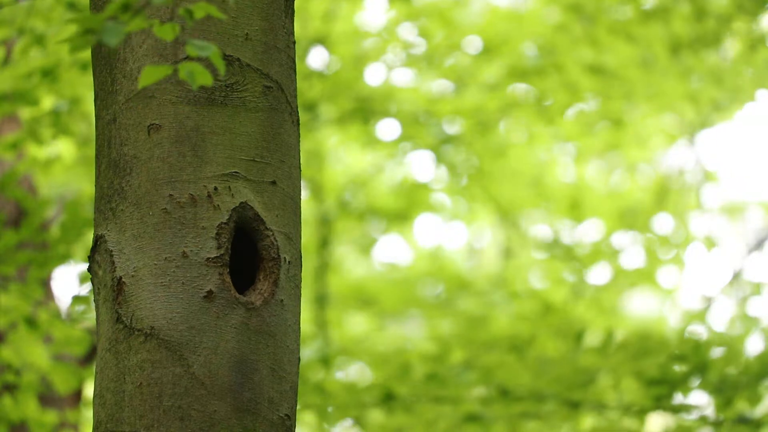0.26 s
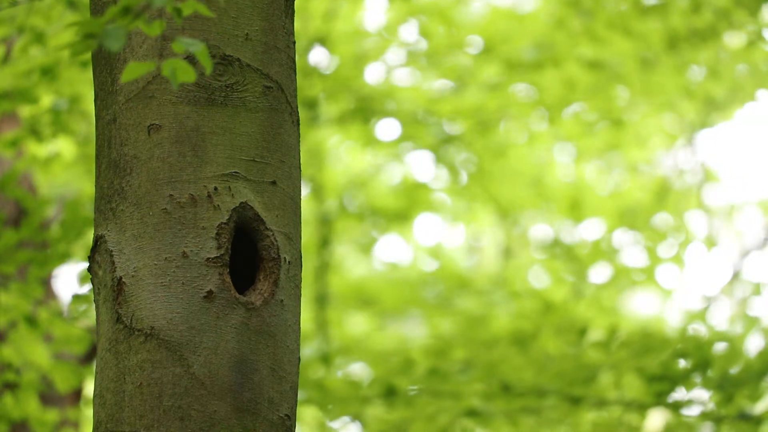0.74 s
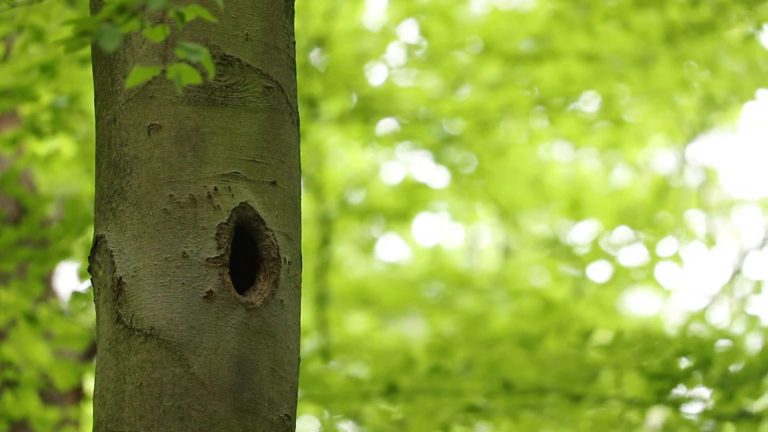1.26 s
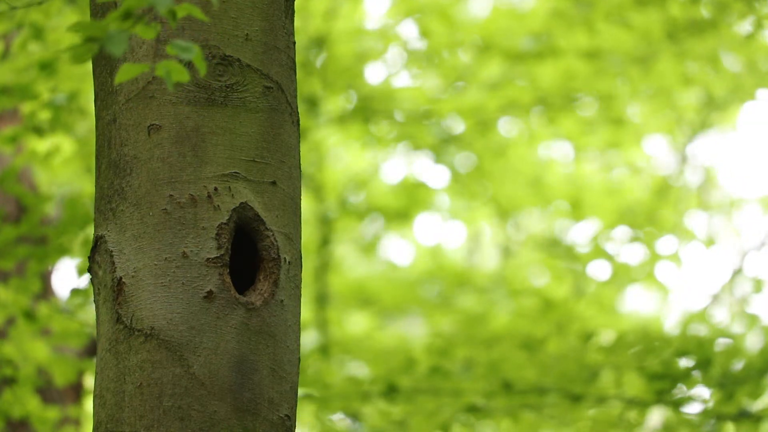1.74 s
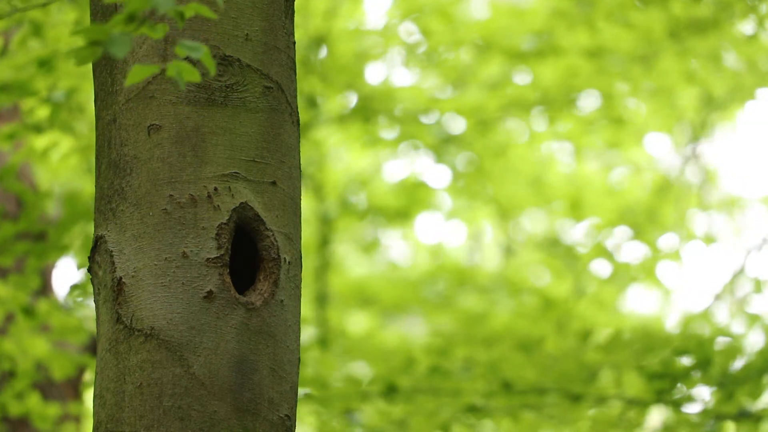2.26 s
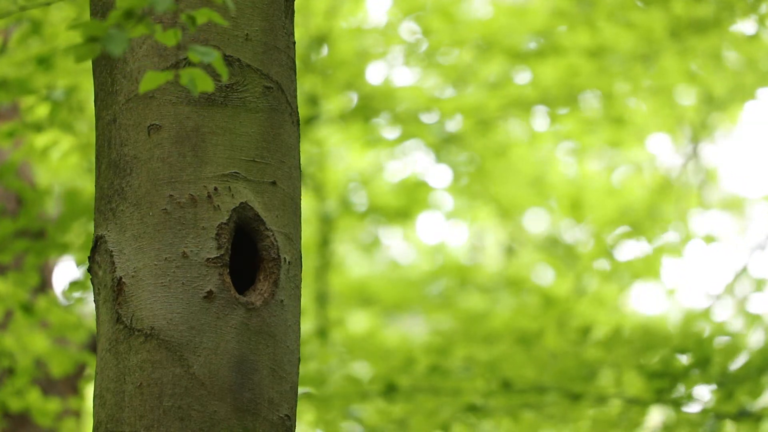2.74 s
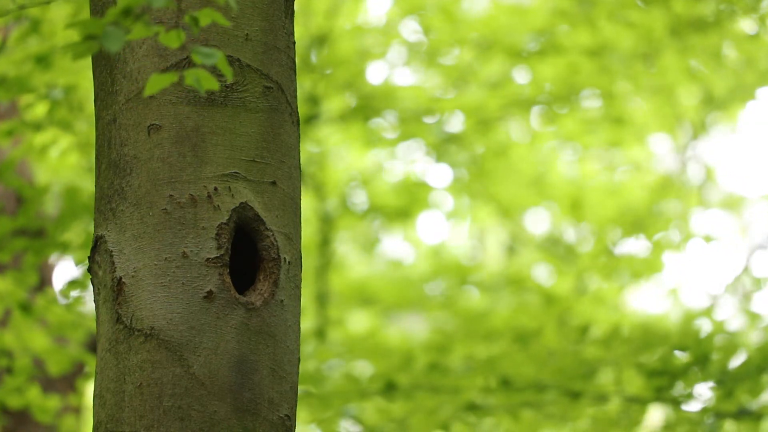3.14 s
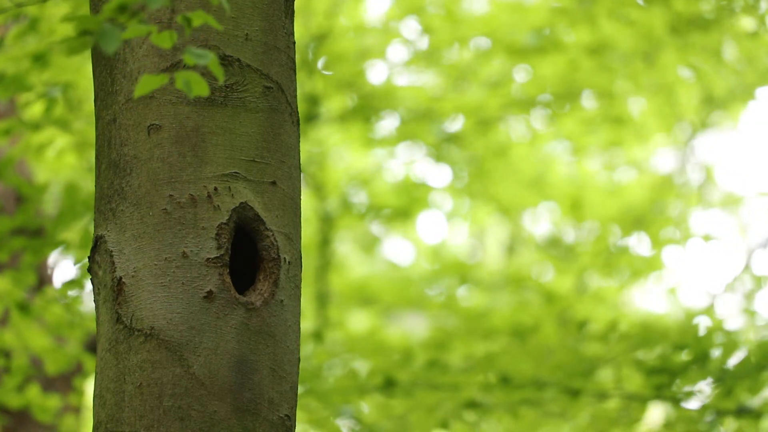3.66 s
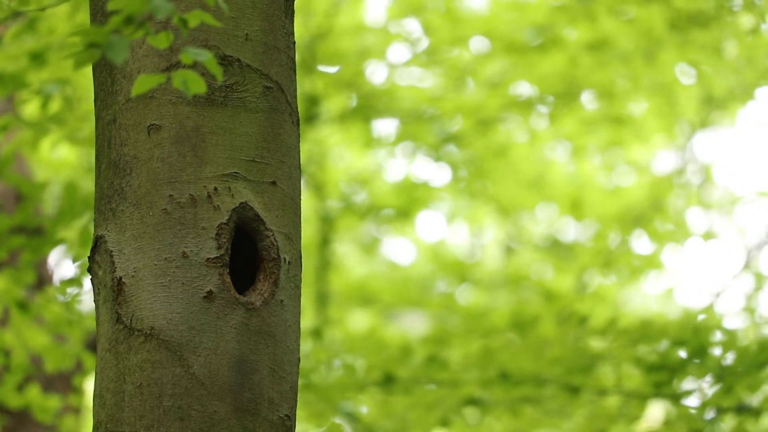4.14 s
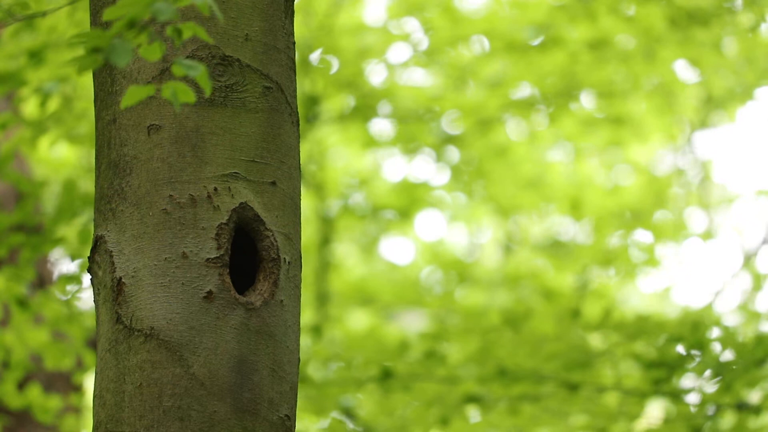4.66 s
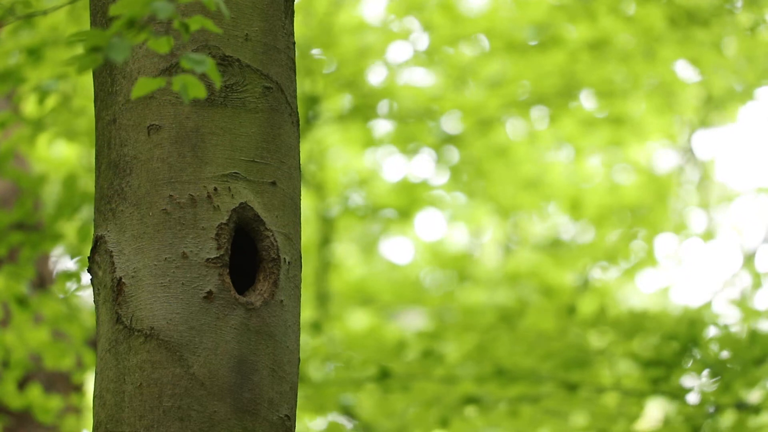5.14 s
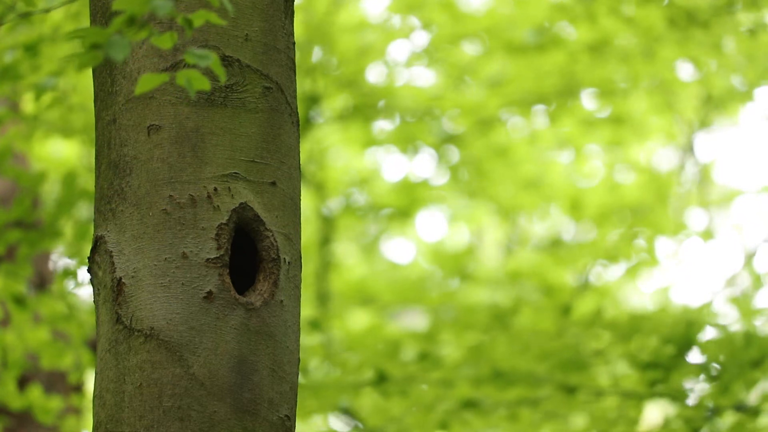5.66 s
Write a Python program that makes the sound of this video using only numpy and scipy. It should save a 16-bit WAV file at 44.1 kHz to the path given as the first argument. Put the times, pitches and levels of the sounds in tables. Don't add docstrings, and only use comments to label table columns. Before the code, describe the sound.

Outdoor stereo in leafy woodland: steady soft leaf hiss, faint low hum and a distant shimmer of birds. Several songbirds chip, trill and whistle at modest level with long echo, a mellow one to the left. Wind bumps the right side for the first two and a half seconds, then stops. Near the end a woodpecker on the right gives loud, rattling bursts of short whistled pulses, ringing between the trunks.

```python
import sys
import numpy as np
from scipy import signal
from scipy.fft import rfft, irfft, next_fast_len
from scipy.io import wavfile
from scipy.ndimage import uniform_filter1d, map_coordinates

SR = 44100
rng = np.random.default_rng(int(sys.argv[2]) if len(sys.argv) > 2 else 0)


def how_loud(loudness_db):
    steps = np.asarray(loudness_db, float) / 20
    return 10 ** steps


def pcm_store(signal):
    levels = np.round(np.clip(np.atleast_2d(signal), -1, 1) * 32767)
    wavfile.write(sys.argv[1], SR, levels.astype(np.int16).T)


N = 259749
TIME = np.arange(N) / SR
LAG_S = 0.00018


def unit(x):
    return x / np.sqrt(np.mean(x ** 2) + 1e-20)


def along(points, hz):
    f, v = np.transpose(points)
    return np.interp(np.log(hz + 1), np.log(f + 1), v)


def curves(rows, t=TIME):
    s, *cols = np.transpose(rows)
    return [np.interp(t, s, c) for c in cols]


def wobble(rate_hz, count=N):
    knots = rng.standard_normal(int(count * rate_hz / SR) + 4)
    return map_coordinates(knots, [np.arange(count) * rate_hz / SR])


def filtered(x, response):
    m = next_fast_len(N + 8192)
    return irfft(rfft(x, m) * response(np.fft.rfftfreq(m, 1 / SR)), m)[..., :N]


def shaped(x, points):
    return filtered(x, lambda hz: how_loud(along(points, hz)))


def add(track, s, x):
    part = track[..., max(round(s * SR), 0):][..., :x.shape[-1]]
    part += x[..., :part.shape[-1]]


def patchy(depth_db, bins, frames):
    z = signal.stft(rng.standard_normal((2, N)), nperseg=512)[2]
    field = uniform_filter1d(rng.standard_normal(z.shape[1:]), bins, 0)
    field = uniform_filter1d(field, frames, 1)
    return signal.istft(z * how_loud(depth_db * unit(field)), nperseg=512)[1][:, :N]


# (frequency [Hz], t60 [s])
ECHO_DECAY = [(1000, 1), (2000, 1), (4000, 1), (8000, 0.65), (15000, 0.96)]


def echo(x, gap_s, piece=8192):
    out = np.zeros((2, N))
    for start in range(0, N, piece):
        hz, t, z = signal.stft(rng.standard_normal((2, SR * 3 // 4)), SR, nperseg=256)
        swell = np.clip(t / gap_s, 0, 1)
        decay = how_loud(-60 * t / along(ECHO_DECAY, hz)[:, None])
        tail = signal.istft(z * swell * decay, SR, nperseg=256)[1]
        tail = tail / np.linalg.norm(tail[0])
        add(out, start / SR, signal.fftconvolve(x[None, start:start + piece], tail, axes=1))
    return out


# (frequency [Hz], density [dB/Hz])
AIR_SPECTRUM = [(10, -47.5), (25, -37), (60, -44), (100, -18.5), (160, -18), (300, -15), (600, -16.5),
                (1300, -21), (2500, -27.5), (5000, -39), (8000, -34.5), (12000, -43.5), (15500, -47.5)]
# (frequency [Hz], likeness [0-1])
PORT_LIKENESS = [(30, .3), (130, .35), (300, .6), (650, .4), (1400, .3), (3000, .3), (7000, .2),
                 (15000, .1)]
# (frequency [Hz], left minus right [dB])
AIR_BALANCE = [(60, 5), (700, 2), (4000, 1.5)]


def air(level_db=-49):
    def mid_side(hz):
        angle = np.arccos(np.clip(along(PORT_LIKENESS, hz), -1, 1)) / 2
        return how_loud(along(AIR_SPECTRUM, hz)) * [np.cos(angle), np.sin(angle)]

    def balance(hz):
        half_db = along(AIR_BALANCE, hz) / 2
        return [how_loud(half_db) * np.exp(-2j * np.pi * hz * LAG_S), how_loud(-half_db)]

    mid, side = filtered(patchy(0.27, bins=6, frames=14), mid_side)
    return how_loud(level_db) * unit(filtered(np.array([mid + side, mid - side]), balance))


# (time [s], level [dB])
CHORUS_LEVEL = [(0.0, -49), (0.95, -47.5), (1.77, -49), (4.56, -52), (4.99, -46), (5.89, -48)]
# (frequency [Hz], gain [dB])
CHORUS_BAND = [(1200, -12), (2200, -5), (2900, -4.5), (3600, 0), (4300, -5.5), (5200, -10), (7000, -17.5),
               (9000, -67)]


def chorus():
    shimmer = shaped(patchy(3.2, bins=4, frames=7), CHORUS_BAND)
    return how_loud(curves(CHORUS_LEVEL)[0] - 1.0) * unit(shimmer)


# (time [s], level [dB])
SWAY_LEVEL = [(2.7, -54.5), (5.58, -54.5), (5.89, -58.5)]
# (frequency [Hz], gain [dB])
SWAY_BAND = [(10, -24), (25, 3), (60, 1), (90, -9), (150, -34), (400, -120)]


def sway():
    rumble = shaped(rng.standard_normal((2, N)), SWAY_BAND)
    rumble = rumble + 0.28 * rumble[::-1]
    gusts = how_loud(6.0 * np.array([wobble(9.6), wobble(3.38)]))
    port_db = [[5.5], [2.5]]
    return how_loud(curves(SWAY_LEVEL)[0] + port_db) * unit(rumble * gusts)


# (time [s], length [s], from [Hz], to [Hz], level [dB])
BLACKBIRD = [(0, 0.13, 2390, 2412, -51), (2.45, 0.082, 2853, 2820, -42), (2.54, 0.075, 2857, 2846, -43.5),
             (2.66, 0.036, 2190, 2230, -44.5), (2.669, 0.03, 2830, 2730, -59),
             (3.116, 0.11, 2792, 2744, -51.5), (3.29, 0.0905, 2713, 2390, -45.5),
             (3.363, 0.12, 2430, 2282, -40), (3.469, 0.15, 2260, 2197, -40),
             (3.553, 0.094, 1550, 1951, -48), (3.766, .03, 2910, 2115, -38),
             (3.794, 0.047, 2150, 2100, -38.5), (3.83, 0.13, 2138, 2331, -41.5),
             (3.946, 0.089, 2180, 2270, -42.5), (4.177, .07, 1720, 2367, -41),
             (4.22, 0.039, 2157, 2283, -42.5), (4.544, 0.063, 1665, 2096, -42),
             (4.979, 0.068, 2060, 2400, -37.5), (5.034, 0.072, 2410, 3200, -36),
             (5.114, 0.093, 3163, 2793, -42.5), (5.393, 0.063, 2677, 2850, -40),
             (5.44, 0.083, 2740, 2710, -44)]


def blackbird(pan_db=11.5):
    return [(*note, pan_db) for note in BLACKBIRD]


# (time [s], from [Hz], to [Hz], level [dB])
CHIPS = [
    (0.034, 5910, 4883, -50),
    (.21, 5910, 5040, -46),
    (1.919, 4300, 3650, -45),
    (2.067, 4200, 3170, -43),
    (2.239, 3700, 2924, -43),
    (2.687, 3800, 2940, -49),
    (3.15, 5200, 4300, -50),
    (3.22, 5300, 4290, -54),
    (3.782, 4000, 3090, -48),
]


def chips(length_s=.04):
    return [(s, length_s, *rest, 0) for s, *rest in CHIPS]


def repeats(shape, first_s, every_s, levels_db, step_hz=0):
    notes = []
    for k, level_db in enumerate(levels_db):
        for s, length, from_hz, to_hz, db, pan_db in shape:
            shift_hz = k * step_hz
            notes.append((first_s + k * every_s + s, length, from_hz + shift_hz, to_hz + shift_hz,
                          level_db + db, pan_db))
    return notes


# (time [s], length [s], from [Hz], to [Hz], level [dB], left minus right [dB])
QUICK_SYLLABLE = [
    (0, .047, 3800, 3020, 0, -1.5),
    (.08, .035, 4480, 4520, -14, -8),
]
QUICK_DB = [-55, -51, -43.5, -47, -45, -46, -43, -45]
# (time [s], length [s], from [Hz], to [Hz], level [dB], left minus right [dB])
SLOW_SYLLABLE = [
    (0.0095, .04, 3930, 3740, 2, -2),
    (0.023, .046, 3200, 2930, -2, 1),
    (.045, 0.089, 4930, 4860, -10.5, 0),
    (0.069, .06, 2950, 2390, -7.5, 1),
    (.085, 0.05, 4500, 3850, -6, 6),
]
SLOW_DB = [-42, -41.5, -39.5]
# (time [s], length [s], from [Hz], to [Hz], level [dB])
FLOURISH = [
    (1.203, 0.092, 4860, 4890, -52),
    (1.245, 0.066, 6430, 4980, -48),
    (1.366, .083, 6400, 5160, -51),
    (1.482, 0.076, 3660, 3755, -41.5),
    (1.505, .03, 3120, 2740, -52),
    (1.578, 0.0325, 3063, 2690, -45),
    (1.584, .03, 2926, 3150, -42),
    (1.629, .057, 2900, 2230, -47),
]


def finch():
    quick = repeats(QUICK_SYLLABLE, .087, .0872, QUICK_DB)
    slow = repeats(SLOW_SYLLABLE, .783, 0.14, SLOW_DB, step_hz=-68.5)
    return quick + slow + [(*note, 0) for note in FLOURISH]


# (time [s], length [s], from [Hz], to [Hz], level [dB], left minus right [dB])
TIT_ROUND = [
    (0, .12, 4277, 4204, 2, 6),
    (.115, 0.094, 6100, 6080, -9, -10),
]
TIT_DB = [-45.5, -45.5, -49, -46.5, -49.5]


def tit():
    return repeats(TIT_ROUND, .384, .268, TIT_DB, step_hz=22.3)


# (time [s], length [s], from [Hz], to [Hz], level [dB])
RIVAL = [(1.815, 0.14, 1700, 1850, -51), (1.956, 0.058, 1790, 1769, -49), (2.079, .13, 2447, 1900, -45.5),
         (2.195, 0.089, 1958, 1690, -44.5), (2.397, 0.063, 2034, 2280, -44), (2.446, 0.18, 2220, 2300, -56),
         (2.863, 0.067, 3130, 3840, -54), (2.922, 0.081, 2880, 3050, -46.5), (3.022, .14, 3070, 2840, -52),
         (2.988, 0.051, 2404, 1937, -44), (4.251, 0.093, 4210, 4112, -53), (4.28, 0.12, 2240, 2276, -54),
         (4.295, .15, 7840, 7724, -64), (4.44, 0.049, 1780, 1694, -45.5), (5.55, 0.053, 4750, 4280, -39.5),
         (5.583, 0.068, 4275, 4203, -44)]


def rival():
    return [(*note, 0) for note in RIVAL]


def songbirds(wet_db=0, dry_db=-2.5):
    near, song = np.zeros((2, N)), np.zeros(N)
    for s, length, from_hz, to_hz, db, pan_db in blackbird() + chips() + finch() + tit() + rival():
        u = np.linspace(0, 1, int(length * 1.1 * SR))
        glide = (1 - u) ** (2.4 if from_hz - to_hz > 600 else 1.1)
        warble = 1 + .006 * wobble(130, count=len(u))
        pitch_hz = (to_hz + (from_hz - to_hz) * glide) * warble
        level = how_loud(db + 3.2 * wobble(70, count=len(u)))
        shape = np.abs(np.sin(np.pi * u ** .8)) ** .9 * level
        note = shape * np.sin(2 * np.pi * np.cumsum(pitch_hz) / SR)
        direct = how_loud(-7 * (abs(from_hz - to_hz) > 500))
        add(near[0], s + LAG_S, direct * how_loud(pan_db / 2) * note)
        add(near[1], s, direct * how_loud(-pan_db / 2) * note)
        add(song, s, note)
    return how_loud(dry_db) * near + how_loud(wet_db) * echo(song, gap_s=0.01)


# (time [s], level [dB])
BREEZE_LEVEL = [(0.0, -54.5), (2.26, -53), (2.5, -54), (2.7, -66)]
# (frequency [Hz], gain [dB])
BUFFET_BAND = [(15, -120), (25, -6), (60, 3.5), (120, 0), (200, -10), (400, -18.5), (800, -120)]


def buffeting():
    fade = np.clip((2.62 - TIME) / .2, 0, 1)
    rumble = shaped(rng.standard_normal(N), BUFFET_BAND)
    lumpy = unit(rumble * how_loud(3.5 * wobble(24.85)))
    return how_loud(curves(BREEZE_LEVEL)[0] + 11.0) * fade * lumpy


# (time [s], peak level [dB], frequency [Hz])
THUMPS = [(0.014, -23.5, 157), (0.066, -26, 131), (0.089, -30.5, 75), (0.478, -23.5, 84.4),
          (0.6094, -31, 90), (0.6786, -20, 93), (0.7954, -23, 103), (0.807, -21, 154), (0.819, -27, 60),
          (0.865, -26.5, 62), (0.9295, -27, 94), (.992, -27, 113), (1.253, -22.5, 147),
          (1.329, -21.5, 71.6), (1.3665, -28, 124), (1.395, -26, 62), (1.5266, -29.5, 105),
          (1.547, -31, 69), (1.726, -29, 70), (1.7666, -23, 122), (1.7751, -30, 116), (1.8103, -19.5, 120),
          (1.9655, -26, 125), (1.9733, -25, 152), (2.0513, -32, 66), (2.1644, -28, 58), (2.301, -20.5, 130),
          (2.335, -23, 103), (2.37, -29, 66), (2.413, -28, 74)]


def wind(leak_db=-18):
    port = buffeting()
    t = np.arange(-500, 500) / SR
    signs = rng.choice([-1, 1], size=len(THUMPS))
    for (s, db, hz), sign in zip(THUMPS, signs):
        u = (np.pi * hz * t * .9) ** 2
        add(port, s + t[0], sign * how_loud(db) * (1 - 2 * u) * np.exp(-u))
    return port * how_loud([[leak_db], [0]])


BEND = [(0, 1.03), (.2, 1.01), (.45, .978), (.7, .99), (1, 1.005)]


def whistle(hz, ms, partial_db, droop_db, attack_ms=3.2, release_ms=5.0, jitter=.013):
    t_ms = np.arange(int(ms * SR / 1000)) / SR * 1000
    count = len(t_ms)
    pitch_hz = hz * curves(BEND, t_ms / ms)[0] * (1 + jitter * wobble(524, count))
    phase = 2 * np.pi * np.cumsum(pitch_hz) / SR
    gate = np.clip(t_ms / attack_ms, 0, 1) * np.clip((ms - t_ms) / release_ms, 0, 1)
    gate = np.sin(np.pi / 2 * gate) ** 2
    sag = how_loud(-droop_db * t_ms / ms + .6 * wobble(200, count))
    tone = np.zeros(count)
    for k, db in enumerate(partial_db):
        flutter = how_loud(.9 * k * wobble(683, count))
        tone += how_loud(db) * gate ** (1 + 0.5 * k) * flutter * np.sin((k + 1) * phase)
    return sag * tone


# (time [s], level [dB], pitch [Hz], length [ms], octave level [dB])
CLUCKS = [
    (4.586, -22, 1540, 7.5, -12),
    (4.717, -30.5, 1203, 10.6, 7.5),
    (4.945, -31, 1210, 6.3, 2),
    (5.035, -40, 1130, 12, 2),
    (5.262, -31.5, 1067, 6.5, -9.5),
    (5.553, -35, 1210, 6.5, 10),
    (5.626, -28.5, 1100, 5.7, 9.5),
    (5.733, -18.5, 1200, 4.36, 14.5),
]


def clucks():
    return [(s, how_loud(db) * whistle(hz, ms, [0, octave_db], 2.1)) for s, db, hz, ms, octave_db in CLUCKS]


# (time [s], peak level [dB], pitch [Hz], length [ms])
PULSES = [(4.6113, -13.5, 1874, 16.4), (4.649, -11.5, 1931, 14.2), (4.684, -12.5, 1858, 14.3),
          (4.7302, -33, 1825, 20), (4.8088, -9.5, 1749, 23.5), (4.845, -11, 1737, 18),
          (4.8836, -9.5, 1755, 21.3), (4.9229, -10, 1761, 19), (5.0434, -18, 1692, 14.5),
          (5.077, -10, 1729, 19.3), (5.1142, -8.5, 1736, 18.7), (5.1542, -11, 1744, 21),
          (5.198, -23, 1675, 31), (5.2729, -12.5, 1736, 14.6), (5.3057, -17, 1788, 12.5),
          (5.3416, -14.5, 1762, 13.5), (5.4611, -19.5, 1750, 13), (5.497, -17, 1748, 11.5),
          (5.5313, -8.5, 1777, 15.8), (5.637, -22, 1786, 16), (5.6736, -11.5, 1732, 14.4),
          (5.71, -11.5, 1756, 18.6), (5.8277, -19, 1700, 14), (5.8604, -15.5, 1825, 15)]
PARTIALS_DB = [2, -15.5, -27.5, -19, -21.5, -29.5, -31.5, -39]
# (time [s], left minus right [dB], echo [dB], upper overtone rasp [dB], all overtones [dB])
FLIGHT = [(4.6, -3, -11, -7, 0), (4.75, -19.5, -10.5, -5, 1.5), (4.8, -5, -11.5, -0.5, 2.5),
          (5.1, -8, -19.5, 3.5, 5), (5.3, -10, -9.5, 0, 3.5), (5.5, -7, -13.5, 0, 5),
          (5.7, -5, -11.5, -8, 8.5), (5.89, -3.5, -13.5, -3.5, 7.5)]


def pulses():
    droop_db_per_ms, steady_ms = 1.3, 11.4
    thin_per_db, full_db = 0.77, -14.5
    order = np.arange(len(PARTIALS_DB))
    notes = []
    for s, db, hz, ms in PULSES:
        rasp_db, bright_db = curves(FLIGHT, s)[2:]
        droop_db = droop_db_per_ms * (ms - steady_ms)
        overtone_db = bright_db + thin_per_db * (full_db - db)
        partial_db = PARTIALS_DB + overtone_db * (order > 0) + rasp_db * (order > 2)
        notes.append((s, how_loud(db + min(droop_db, 0)) * whistle(hz, ms, partial_db, droop_db)))
    return notes


# (frequency [Hz], gain [dB])
LEFT_SHADE = [(2000, -2.5), (3500, -2.5), (12000, -29)]
# (frequency [Hz], gain [dB])
BILL_BEAM = [(2000, 0), (3500, -1.5), (7000, -8), (12000, -15)]
# (frequency [Hz], gain [dB])
TRUNK_SPREAD = [(2000, 2.5), (3500, 5), (5200, 8.5), (7000, 7), (9000, 1), (12000, -2.5), (15000, -5)]


def woodpecker():
    near, call = np.zeros((2, N)), np.zeros(N)
    for s, note in clucks() + pulses():
        left_db, echo_db = curves(FLIGHT, s)[:2]
        add(near[0], s + LAG_S, how_loud(left_db) * note)
        add(near[1], s, note)
        add(call, s, how_loud(echo_db) * note)
    near[0] = shaped(near[0], LEFT_SHADE)
    near = shaped(near, BILL_BEAM)
    return near + echo(shaped(call, TRUNK_SPREAD), gap_s=0.0022)


def scene():
    return air() + chorus() + sway() + songbirds() + wind() + woodpecker()


def top_cut(x):
    return signal.sosfilt(signal.butter(12, 15700, fs=SR, output="sos"), x)


def record(dry):
    mix = filtered(dry, lambda hz: hz < 15700)
    return top_cut(mix)


dry = scene()
out = record(dry)
pcm_store(out)
```